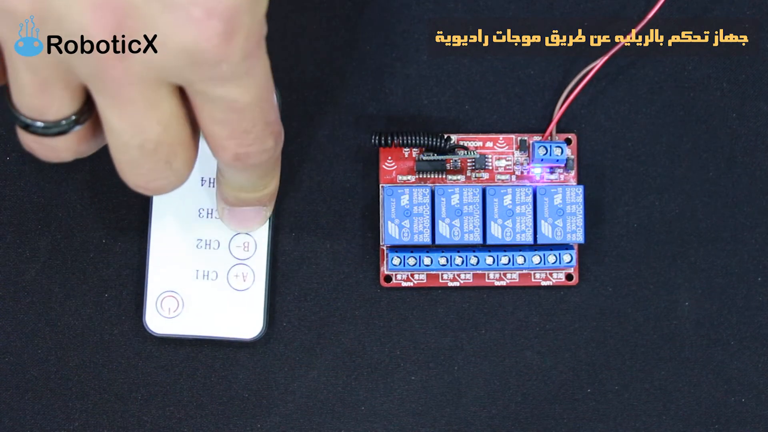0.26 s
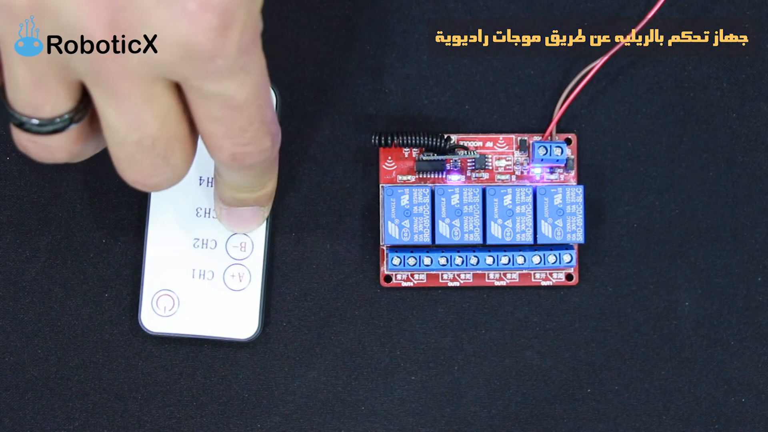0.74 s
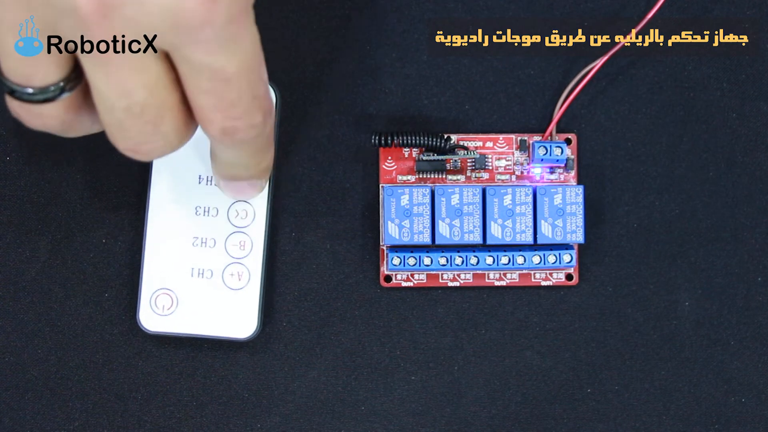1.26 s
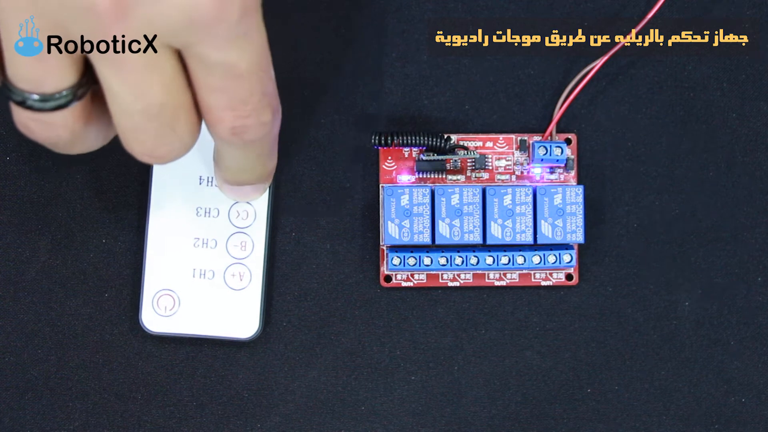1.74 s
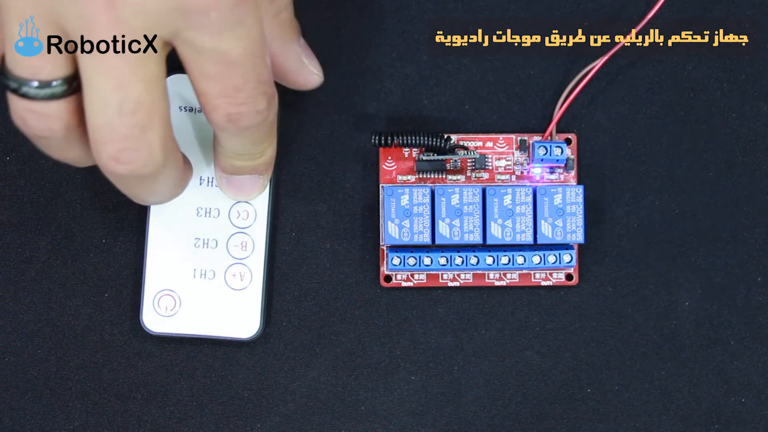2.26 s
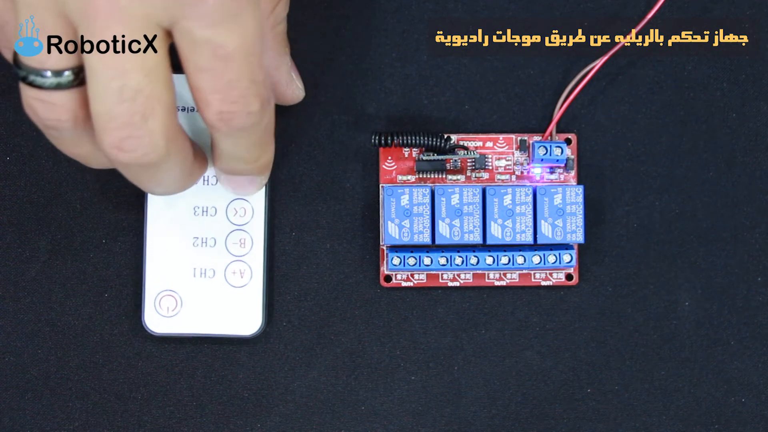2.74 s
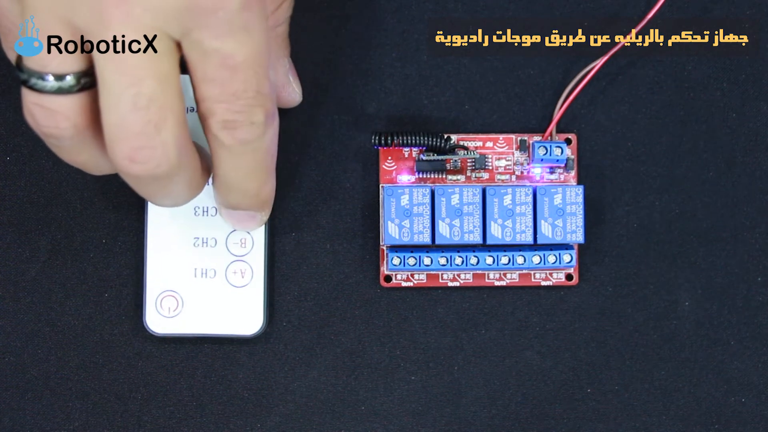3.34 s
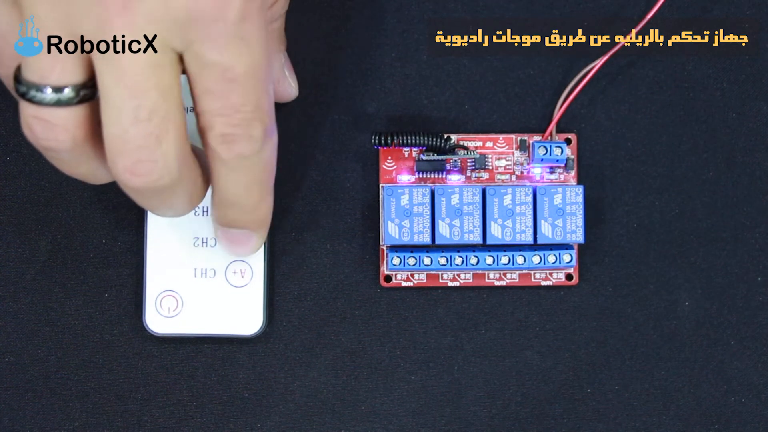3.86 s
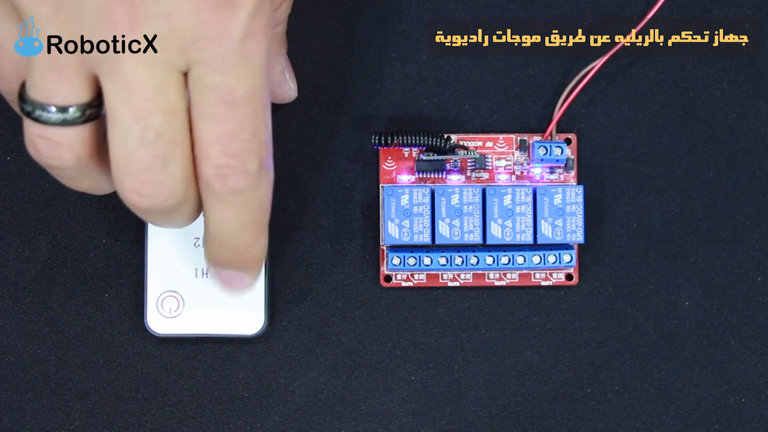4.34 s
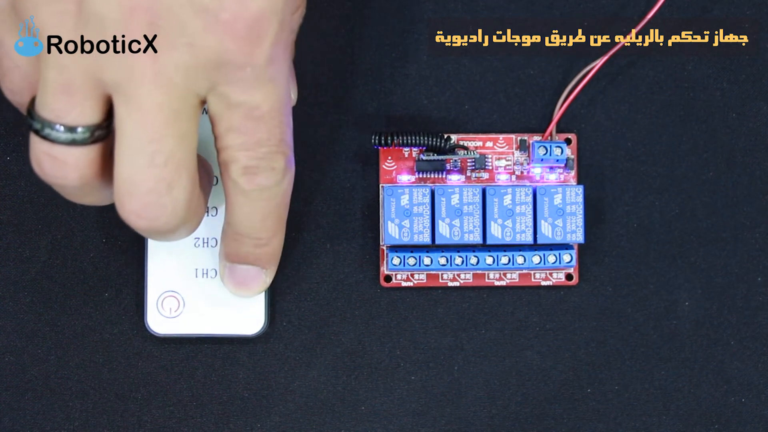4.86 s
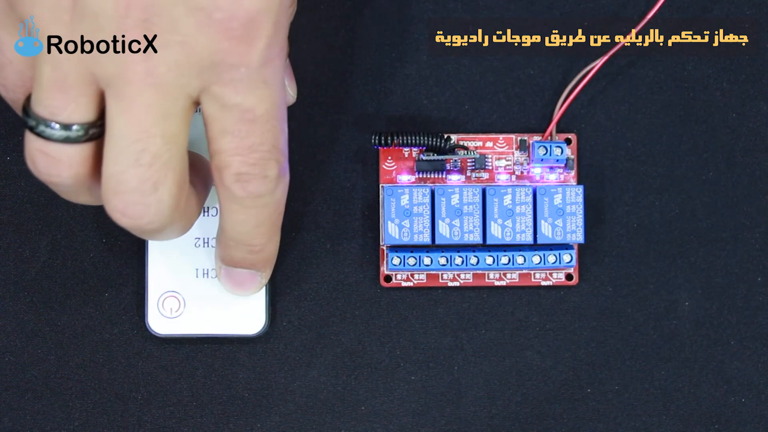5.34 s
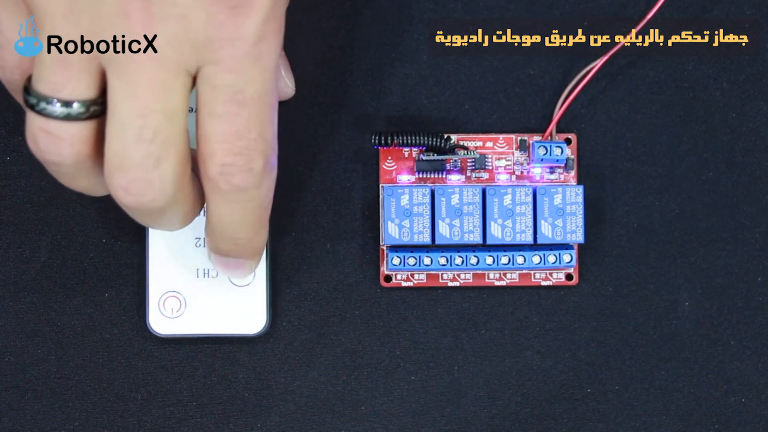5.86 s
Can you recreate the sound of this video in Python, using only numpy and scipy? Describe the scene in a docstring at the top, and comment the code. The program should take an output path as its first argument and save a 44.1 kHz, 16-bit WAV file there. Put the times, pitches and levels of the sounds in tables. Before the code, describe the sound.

Nine sharp, irregularly spaced relay clicks, bright ticks and duller chattering clacks, in a quiet room with barely audible finger thuds and brief dropouts.

```python
"""Relay clicks on a desk

Relays on a small circuit board are switched from a handheld remote, close up on a cloth-covered desk.
Pulling in, the armature slams on the core with a bright tick; let go, it falls back with a duller,
bouncing clack. Both are decaying sine modes over short bursts of coloured noise.
A finger's slow pushes thud softly over quiet room noise; clipped peaks overload the input, which cuts out briefly."""
import sys
import numpy as np
from scipy import signal
from scipy.fft import irfft
from scipy.io import wavfile

SR = 44100
rng = np.random.default_rng(int(sys.argv[2]) if len(sys.argv) > 2 else 0)


def bounce(signal):
    """Save signal as a 16-bit WAV file at the path given by the first command-line argument."""
    frames = np.transpose(np.atleast_2d(signal))
    limited = np.clip(frames, -1, 1)
    pcm = np.round(limited * 32767).astype(np.int16)
    wavfile.write(sys.argv[1], SR, pcm)


N = 269451

# main blow of every pull-in: t/s
PULL_INS = [.6873, 2.0873, 3.1273, 3.7273, 4.3673, 4.9673]
# main blow of every drop-out: t/s
DROP_OUTS = [1.2875, 2.6875, 5.8075]
# colour of the desk's low boom: f/Hz, relative level per Hz/dB
DESK = [(30, -0.5), (110, 5), (190, 0), (350, -16.5), (800, -36), (3000, -36), (11000, -39)]

# each stroke starts this long before its main blow, leaving room for a faint tick ahead of it
LEAD_S = 0.01
STROKE_T = np.arange(SR // 4) / SR - LEAD_S  # s, 0 at the main blow


def undb(db):
    """Decibels to gain."""
    return 10 ** (np.asarray(db) / 20)


def panned(pan_db):
    """Left and right gains for a left-minus-right level difference, shared equally between the two."""
    return undb(np.array([[pan_db], [-pan_db]]) / 2)


def unit(x):
    """Scale to rms 1."""
    return x / np.sqrt(np.mean(x ** 2))


def along(points, hz):
    """Read (Hz, value) points on a log-frequency axis."""
    at, value = np.transpose(points)
    return np.interp(np.log(hz + 1), np.log(at), value)


def noise(colour, likeness, size):
    """Stereo noise of rms 1 with a given spectrum and left-right correlation (a number or points)."""
    hz = np.arange(size // 2 + 1) * SR / size
    alike = along(likeness, hz) if np.ndim(likeness) else likeness
    alike = np.clip(alike, -1, 1)
    mid, side = np.exp(2j * np.pi * rng.random((2, len(hz))))  # random phases
    opposite = np.array([[1], [-1]])
    both = mid * np.sqrt(1 + alike) + side * np.sqrt(1 - alike) * opposite
    return unit(irfft(both * undb(along(colour, hz)), size))


def fade(t, rise_s, t60):
    """A quick swell from t = 0, then a free decay of 60 dB in t60 seconds."""
    t = np.maximum(t, 0)
    swell = 1 - np.exp(-(t / rise_s) ** 2)
    decay = np.exp(-np.log(1000) * t / t60)
    return swell * decay


def add(out, sound, s):
    """Mix a sound in at a time in seconds."""
    start = max(int(round(s * SR)), 0)
    part = sound[:, :N - start]
    out[:, start:start + part.shape[1]] += part


def low_pass(x, hz):
    """Steep low-pass without delay."""
    sos = signal.ellip(8, 0.05, 50, hz, fs=SR, output="sos")
    return signal.sosfiltfilt(sos, x)


def armature(modes, blows, rise_s, left_lag_s):
    """The blow and its bounces ring the modes; the sound reaches the right channel a little earlier."""
    out = 0
    for delay, blow_db in blows:
        t = STROKE_T - delay - np.array([[left_lag_s], [0]])
        for hz, db, t60, pan_db in modes:
            gain = undb(blow_db + db) * panned(pan_db)
            out = out + gain * np.sin(2 * np.pi * hz * t) * fade(t, rise_s, t60)
    return out


def tail(colour, db, rise_s, t60, likeness):
    """Many close resonances dying away together, as a burst of coloured noise."""
    burst = noise(colour, likeness, size=len(STROKE_T))
    return undb(db) * burst * fade(STROKE_T, rise_s, t60)


def pull_in():
    """The coil snaps the armature on to the core: one hard, bright tick."""
    # main blow and bounces: t/s after the main blow, level/dB
    pull_blows = [(0, -1), (.00566, -26.5), (0.0122, -37.5)]
    # relay and board with the armature held on the core: f/Hz, level/dB, t60/s, left minus right/dB
    held_modes = [(117, -44.5, 0.068, -4), (161.5, -32.5, 0.032, -7), (296, -32, .0188, 0),
                  (1380, -18.5, .004, -8), (1440, -28, .011, 3), (2010, -18, .0055, -11),
                  (3527, -32.5, 0.025, 2.15), (4025, -5, 0.0046, -4.5), (4369, -23, .021, 0),
                  (4800, -6.5, 0.0034, -2), (5940, -24.5, 0.036, -0.8), (6070, -8, 0.015, -4.5),
                  (6801, -1.93, .0079, -3), (8750, 9.5, .0043, 0.47), (9000, -20, 0.03, 1.5),
                  (9118, 11.5, .0052, 0), (9240, -17.5, .0215, 0.3), (9656, 6, .0039, -8),
                  (10028, 15.5, .0033, 3)]
    # dense rattle of spring and case: f/Hz, relative level per Hz/dB
    pull_rattle = [(200, -7), (450, -13), (850, -29.5), (1300, -14), (2000, -9.5), (2500, -22), (4200, 0),
                   (5100, -10.5), (6300, 8), (7500, -1), (9300, 1.5), (11000, 0.5)]
    tick = armature(held_modes, pull_blows, rise_s=0.00052, left_lag_s=0.000011)
    rattle = tail(pull_rattle, db=-12.5, rise_s=0.001, t60=0.028, likeness=1.0)
    boom = tail(DESK, db=-47.5, rise_s=0.0034, t60=0.23, likeness=-0.3)
    return tick + rattle + boom


def drop_out():
    """The spring throws the armature back on the rest contact, where it chatters and rocks the board."""
    # a faint tick as the contacts part, then main blow and bounces: t/s after the main blow, level/dB
    drop_blows = [(-.00782, -29.5), (0, 2.3), (.00295, -10.5), (.00558, -9.7)]
    # relay and board with the armature free on its spring: f/Hz, level/dB, t60/s, left minus right/dB
    free_modes = [(104.94, -44.5, .12, -4.5), (299, -35.5, 0.046, -8), (477, -35, 0.041, -8.5),
                  (668, -35, 0.037, -5), (840, -39, 0.009, -2.5), (2922, -45, .026, 10),
                  (3720, -20.5, .0174, -2.5), (4090, -11.5, .0044, -0.5), (4569, -23, .045, 2),
                  (4810, -16.5, 0.023, -1.5), (5599, -32, .031, 1.5), (5862, -21, .026, -1.64),
                  (6250, 9.5, .0029, -2.5), (6635, -19, .022, -3.5), (7258, -23, .0315, -9.5),
                  (8270, -21, .026, -1.4), (8276, -3.5, .0053, -1.5), (8980, 14.5, .0017, 4),
                  (9980, -11, .01, 9), (10360, 8, .0034, 1), (10656, -23.5, 0.045, 0.5)]
    # dense rattle of spring and case: f/Hz, relative level per Hz/dB
    drop_rattle = [(200, -23.5), (750, -14.5), (1200, -15.5), (2200, -17.5), (3500, -3), (4700, -1),
                   (5300, -6), (6000, 13.5), (7200, -7), (11000, -12)]
    # the board's hollow knock: f/Hz, relative level per Hz/dB
    board = [(100, -3.5), (300, -4), (450, -7), (750, 6), (900, -2), (1050, -34.5), (3000, -52)]
    clack = armature(free_modes, drop_blows, rise_s=0.00067, left_lag_s=0.000004)
    rattle = tail(drop_rattle, db=-17.0, rise_s=0.0015, t60=0.035, likeness=0.7)
    knock = tail(board, db=-32.0, rise_s=0.0007, t60=0.062, likeness=-0.5)
    boom = tail(DESK, db=-44.5, rise_s=0.0055, t60=0.2, likeness=-0.2)
    return clack + rattle + knock + boom


def finger(width_s):
    """A soft fingertip gives the remote one slow push at each touch, and at fixed offsets from every stroke."""
    # pushes before and after each pull-in: t/s after the main blow, peak level/dB, left minus right/dB
    on_pushes = [(-.2168, -44, 4.5), (0.1558, -47, -10)]
    # push just before each drop-out: t/s after the main blow, peak level/dB, left minus right/dB
    off_pushes = [(-0.0098, -46.5, 0)]
    # the finger settles lightly on the remote: t/s
    touches = [.237, 1.636]
    touch_db, touch_pan_db = -45.5, 1
    thuds = [(s, touch_db, touch_pan_db) for s in touches]
    for times, pushes in ((PULL_INS, on_pushes), (DROP_OUTS, off_pushes)):
        for s in times:
            thuds += [(s + after_s, db, pan_db) for after_s, db, pan_db in pushes]
    t = np.arange(N) / SR
    out = 0
    for s, db, pan_db in thuds:
        bump = np.exp(-((t - s) / width_s) ** 2)
        out = out - undb(db) * panned(pan_db) * bump
    return out


def room(level_db):
    """Steady low rumble with a thin hiss above it, as coloured noise."""
    # colour of the room noise: f/Hz, relative level per Hz/dB
    room_colour = [(12, -31.5), (20, -10), (53, -7.5), (102, -2.5), (135, -10), (248, -14), (290, -15),
                   (452, -19), (636, -21.5), (688, -19), (848, -24), (993, -24.5), (1770, -27.5),
                   (2070, -29), (10500, -35.5), (13600, -69), (22000, -120)]
    # likeness of left and right: f/Hz, correlation
    room_likeness = [(60, 0.27), (130, .43), (260, 0.11), (1000, .01)]
    return undb(level_db) * noise(room_colour, room_likeness, size=N)


def overload(x, ceiling_db):
    """An input stage flattens the peaks; clipping at twice the rate keeps overtones from folding down as much."""
    ceiling = undb(ceiling_db)
    fine = signal.resample_poly(x, 2, 1, axis=1)
    clipped = np.clip(fine, -ceiling, ceiling)
    return signal.resample_poly(clipped, 1, 2, axis=1)


def scene():
    """Each kind of click repeats alike on every stroke."""
    pull_db, drop_db = 1, 0.5  # gain on every stroke of a kind
    out = room(level_db=-57.8) + finger(width_s=0.0034)
    for stroke, times, db in ((pull_in(), PULL_INS, pull_db), (drop_out(), DROP_OUTS, drop_db)):
        for s in times:
            add(out, undb(db) * stroke, s - LEAD_S)
    return out


def record(dry):
    """A narrow-band input that cuts out at moments; the loudest peaks overload it and splash into the top."""
    # the sound cuts out: start t/s, end t/s
    silences = [(4.107, 4.146), (5.347, 5.586), (6.027, 6.2)]
    band_hz, top_hz = 10700, 16000  # low-passes before and after the overload
    t = np.arange(N) / SR
    live = 1 - sum((t > start) & (t < end) for start, end in silences)
    narrow = low_pass(dry * live, band_hz)
    return low_pass(overload(narrow, ceiling_db=0.0), top_hz)


dry = scene()
out = record(dry)
bounce(out)
```